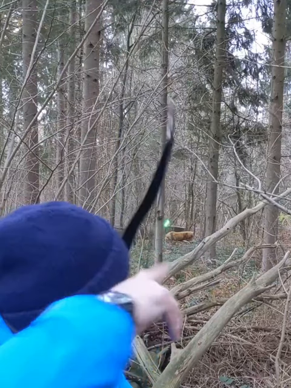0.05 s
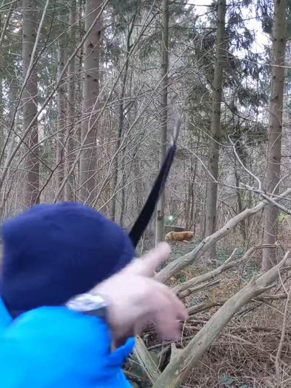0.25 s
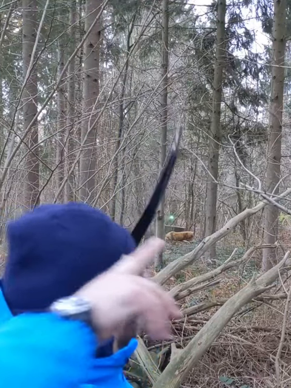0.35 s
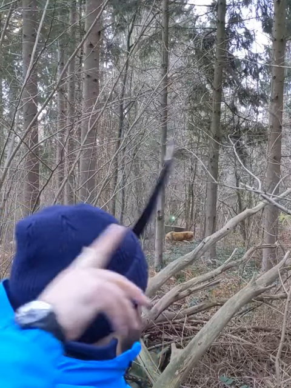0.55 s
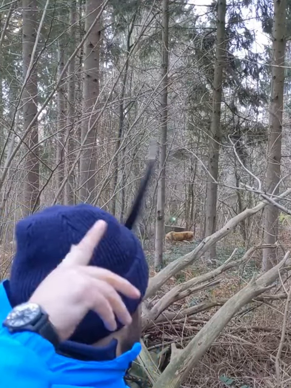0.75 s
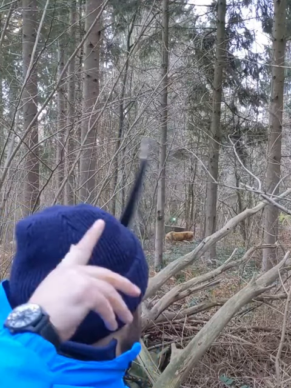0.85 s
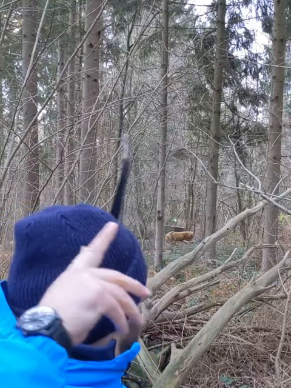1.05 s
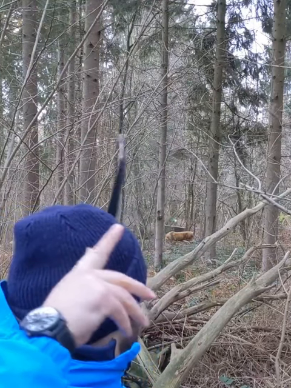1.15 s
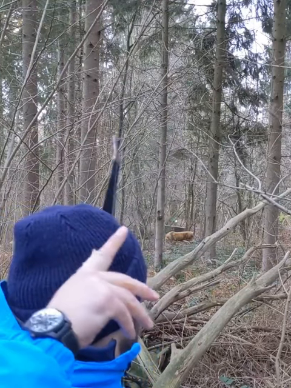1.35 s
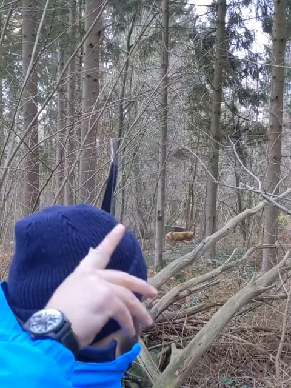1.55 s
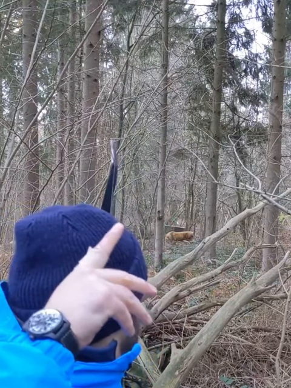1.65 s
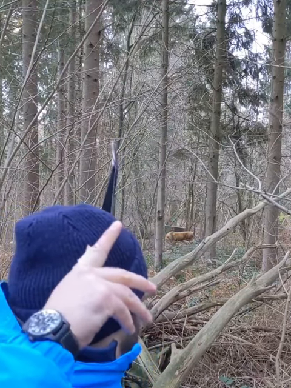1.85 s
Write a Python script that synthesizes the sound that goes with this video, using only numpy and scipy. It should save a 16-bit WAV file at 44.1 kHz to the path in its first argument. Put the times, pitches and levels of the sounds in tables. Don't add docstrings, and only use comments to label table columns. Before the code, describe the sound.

A slowed bow release in quiet woodland: faint string friction, gritty arrow scrape and hollow knocks, a hard clattering slam, then a deep wavering string hum and hissy tree echo over low rumble, in close stereo.

```python
import sys
import numpy as np
from scipy import signal
from scipy.fft import rfft, irfft, next_fast_len
from scipy.io import wavfile
from scipy.ndimage import map_coordinates

SR = 44100
rng = np.random.default_rng(int(sys.argv[2]) if len(sys.argv) > 2 else 0)


def field_ratio(decibels):
    return 10 ** (np.asarray(decibels, dtype=float) / 20)


def output_pcm(signal):
    pcm = np.clip(np.atleast_2d(signal).T, -1, 1) * 32767
    wavfile.write(sys.argv[1], SR, np.round(pcm).astype(np.int16))


N = 83790
TIME_S = np.arange(N) / SR
SIDE = np.array([[1], [-1]])
TOP_HZ = 3170


def unit(x):
    return x / np.sqrt(np.mean(x ** 2) + 1e-20)


def along(points, hz):
    f, v = np.transpose(points)
    return np.interp(np.log(hz + 1), np.log(f + 1), v)


def curve(rows, fade_db_per_s):
    s, db = np.transpose(rows)
    outside_s = np.maximum(TIME_S - s[-1], 0) + 10 * np.maximum(s[0] - TIME_S, 0)
    return field_ratio(np.interp(TIME_S, s, db) - fade_db_per_s * outside_s)


def wobble(rate_hz):
    knots = rng.standard_normal(int(N * rate_hz / SR) + 4)
    return map_coordinates(knots, [np.arange(N) * rate_hz / SR])


def filtered(x, response):
    m = next_fast_len(x.shape[-1] + SR // 2)
    spectrum = rfft(x, m) * response(np.fft.rfftfreq(m, 1 / SR))
    return irfft(spectrum, m)[..., :x.shape[-1]]


def paired(pair, colour):
    # hz, likeness
    likeness = [(60, 1), (200, -0.0044), (500, -0.077), (1200, -0.12), (3000, 0.08)]

    def mid_side(hz):
        turn = np.arccos(np.clip(along(likeness, hz), -1, 1)) / 2
        return field_ratio(along(colour, hz)) * [np.cos(turn), np.sin(turn)]

    mid, side = filtered(pair, mid_side)
    return np.array([mid + side, mid - side])


def rush(colour):
    return unit(paired(rng.standard_normal((2, N)), colour))


def ring(hz, db, t60_s, swell_s, t, phase=0):
    t = np.maximum(t, 0)
    return field_ratio(db - 60 * t / t60_s) * (1 - np.exp(-t / swell_s)) * np.sin(2 * np.pi * hz * t + phase)


def wood():
    # hz, density_db_per_hz
    floor_colour = [(10, -7), (35, -7.5), (75, -7), (135, -4.5), (210, -12.5), (420, -24), (640, -39.5),
                    (3200, -44.5)]
    # start_s, level_db, pitch_hz
    twigs = [
        (1.378, -59, 2060),
        (1.663, -57, 2500),
        (1.785, -58, 1760),
        (1.786, -57, 1000),
    ]
    ticks = sum(ring(hz, db, 0.061, 0.0033, TIME_S - s) for s, db, hz in twigs)
    level_db = -41 + 0.21 * wobble(2.5) + 0.81 * wobble(13.9)
    return field_ratio(level_db) * rush(floor_colour) + ticks


def trees(x, decay, delay_s):
    low_cut_hz = 160
    hz, t, z = signal.stft(rng.standard_normal((2, N)), SR, nperseg=512)
    fade = field_ratio(-60 * t / along(decay, hz)[:, None])
    tail = signal.istft(z * fade, SR, nperseg=512)[1]
    swell = 1 - np.exp(-np.arange(tail.shape[1]) / SR / delay_s)
    tail = paired(tail * swell, [(low_cut_hz / 4, -20), (low_cut_hz, 0)])
    return signal.fftconvolve(x.mean(0)[None], tail / np.linalg.norm(tail[0]), axes=1)[:, :N]


def hum():
    left_db = -0.6
    # pitch_hz, level_db, start_s, swell_s, t60_s
    string = [
        (25.2, -19.5, .3659, .015, .95),
        (27.7, -20, .3814, .008, 1.35),
        (13.1, -33, .3514, .02, 1.3),
        (83.5, -23, .3804, .004, 1.0),
        (94.3, -33, .3796, .004, 1.6),
        (79.2, -15, .3747, .004, .16),
    ]
    # pitch_hz, level_db, start_s, swell_s, t60_s
    lurch = (41, -22, .316, .012, .35)
    modes = list(string) + [lurch]
    swings = sum(ring(hz, db, t60, swell, TIME_S - s) for hz, db, s, swell, t60 in modes)
    return field_ratio(left_db * SIDE) * swings


def creep():
    # time_s, level_db
    slip = [
        (0, -80),
        (.06, -65),
        (.12, -61),
        (.18, -63),
        (.2, -68),
    ]
    # hz, density_db_per_hz
    slip_colour = [(400, -27), (920, 7.5), (1200, -16), (1800, 2), (2600, -15), (3200, -33)]
    return curve(slip, fade_db_per_s=400) * field_ratio(2 * wobble(30)) * rush(slip_colour)


def swish():
    band_db, left_db, grit_db, grit_per_s = 9, 1.3, 2, 350
    # time_s, level_db
    effort = [
        (.192, -60),
        (.207, -43),
        (.236, -36),
        (.248, -42),
        (.271, -41),
        (.279, -28),
        (.312, -29),
        (.318, -25),
        (.326, -31),
        (.39, -33),
    ]
    # hz, density_db_per_hz
    scrape_colour = [(100, -41.5), (250, -17), (500, -12.5), (1000, -14.5), (1800, -17.5), (2500, -23.5),
                     (3200, -28.5)]
    grit = field_ratio(left_db * SIDE + grit_db * wobble(grit_per_s))
    return field_ratio(band_db) * curve(effort, fade_db_per_s=246) * unit(grit * rush(scrape_colour))


def contact_crack(crack_db, t):
    t60_s, swell_s = .022, .0015
    noise = filtered(rng.standard_normal((2, len(t))), lambda hz: 3.5 * (hz > 1000) * (hz < TOP_HZ))
    return field_ratio(crack_db + 2.5 - 60 * t / t60_s) * (1 - np.exp(-t / swell_s)) * noise


def shaft_ring(shaft_db, since_s, tight, t):
    start_hz, rise_hz_per_s = 812.3, 404.3
    left_db, lag_s, swell_s, upper_slack_db = 4, .00012, .0025, -8
    # multiple, level_db, t60_s
    shaft = [(1, 0, .038), (.87, -7, .035), (1.145, -6, .035), (1.9, -10, .022), (2.23, -8, .022)]
    hz = start_hz + rise_hz_per_s * since_s
    turns = (start_hz + rise_hz_per_s * since_s / 2) * since_s
    out = 0
    for k, db, t60 in shaft:
        slack_db = upper_slack_db * (k > 1) * (not tight)
        level_db = shaft_db + 2.5 + db + slack_db + left_db * SIDE
        out = out + ring(k * hz, level_db, t60, swell_s, t + SIDE * lag_s, 2 * np.pi * k * turns)
    return out


def bow_thud(grip_db, limb_db, start_s, tight, t):
    riser_slack_db = -11
    # pitch_hz, level_db, t60_s
    grip = [(268.4, -0.5, 0.085), (348.2, 2.5, 0.068), (408.2, -4, 0.099), (560, -8, .05),
            (665, -9.5, 0.12)]
    # pitch_hz, level_db, t60_s
    limbs = [(97.7, 2, 0.14)]
    # pitch_hz, level_db, t60_s
    riser = [(145, 4, 0.079), (180, -2.5, 0.15), (212, -1.5, 0.12)]
    riser_db = grip_db + riser_slack_db * (not tight)
    out = 0
    for part, part_db in [(grip, grip_db), (limbs, limb_db), (riser, riser_db)]:
        for hz, db, t60 in part:
            level_db = part_db + db - 3 + SIDE * hz / 400 + rng.normal(0, 1.5)
            phase = 2 * np.pi * hz * start_s + rng.normal(0, 1) * hz / 200 + SIDE * hz / 1100
            out = out + ring(hz, level_db, t60, 0.001, t, phase)
    return out


def knocks():
    slam_s = .295
    # start_s, crack_db, shaft_db, grip_db, limb_db
    contacts = [(.189, -66.5, -37.5, -38, -43), (0.194, -54, -34, -54, -43),
                (.205, -41.5, -36, -42.5, -44.5), (0.22, -40.5, -19, -19.5, -30),
                (0.229, -38, -13, -14.5, -21), (0.237, -28, -23, -26, -28), (0.248, -42, -24, -24.5, -34.5),
                (0.2753, -34.5, -33.5, -22.5, -43.5), (0.288, -23.5, -20.5, -28, -31.5),
                (.300, -20, -16.5, -19.5, -27.5), (0.305, -27.5, -16.5, -27, -32.5),
                (0.312, -22, -20, -31, -31), (0.317, -13.5, -8.5, -26, -28),
                (0.325, -35.5, -35, -19, -27.5), (.346, -15.5, -24.5, -17.5, -16.5),
                (0.366, -30.5, -29.5, -26.5, -24), (.378, -24.5, -27.5, -22, -24)]
    bow, arrow, t = np.zeros((2, N)), np.zeros((2, N)), np.arange(SR // 3) / SR
    for s, crack_db, shaft_db, grip_db, limb_db in contacts:
        tight = s >= slam_s
        first = round(s * SR)
        here = slice(first, first + len(t))
        arrow[:, here] += shaft_ring(shaft_db, s - contacts[0][0], tight, t)
        bow[:, here] += contact_crack(crack_db, t) + bow_thud(grip_db, limb_db, s, tight, t)
    return bow, arrow


def scene():
    near_db, far_db, clumps_db = -5.5, -11.5, 1.5
    # hz, t60_s
    near_decay = [(100, 1), (300, 0.98), (700, 0.71), (1500, 0.43), (3000, .6)]
    # hz, t60_s
    far_decay = [(100, 1.4), (300, 3.1), (700, 3.46), (1500, 2.3), (3000, 2.9)]
    bow, arrow = knocks()
    air = swish() + creep()
    thrown = air + .4 * bow + .25 * arrow
    near = field_ratio(near_db) * trees(thrown, near_decay, 0.017)
    far = field_ratio(far_db + clumps_db * wobble(14)) * trees(thrown, far_decay, 0.056)
    return bow + arrow + air + hum() + near + far + wood()


def band_limit(x):
    return signal.sosfilt(signal.butter(12, 16410, fs=SR, output="sos"), x)


def record(dry):
    ceiling, slowed, grid_start, treble_end_hz = 1.3, 5, 1.45, 15800
    grid = np.arange(grid_start - slowed, N + slowed, slowed)
    rounded = dry / (1 + np.abs(dry / ceiling) ** 4) ** .25

    def sampling(hz):
        shift = np.exp(2j * np.pi * hz * (grid_start % 1) / SR)
        line_loss = np.sinc(np.minimum(hz, TOP_HZ) * slowed / SR) ** 2
        return (hz < TOP_HZ) * shift / line_loss

    kept = filtered(rounded, sampling)
    sparse = kept[:, np.clip(grid.astype(int), 0, N - 1)]
    joined = np.array([np.interp(np.arange(N), grid, c) for c in sparse])
    return band_limit(filtered(joined, lambda hz: hz < treble_end_hz))


dry = scene()
out = record(dry)
output_pcm(out)
```